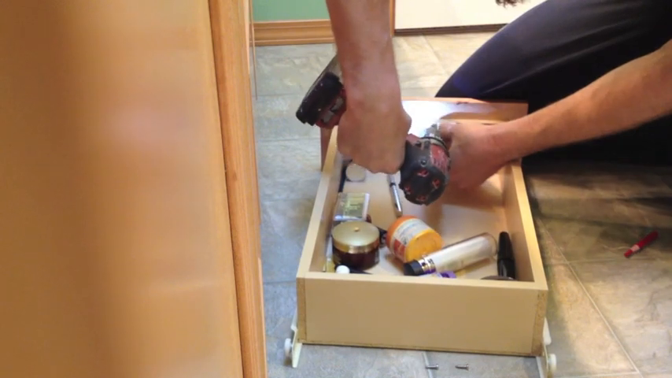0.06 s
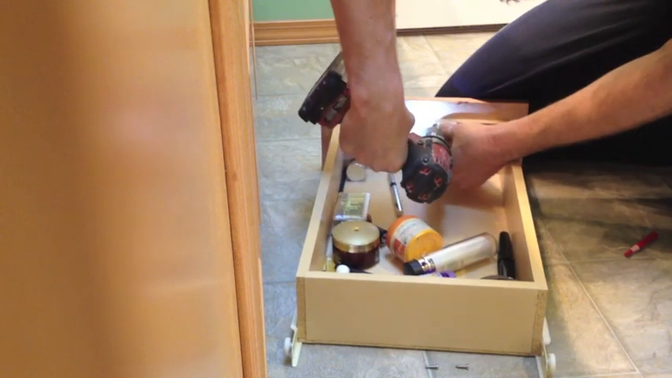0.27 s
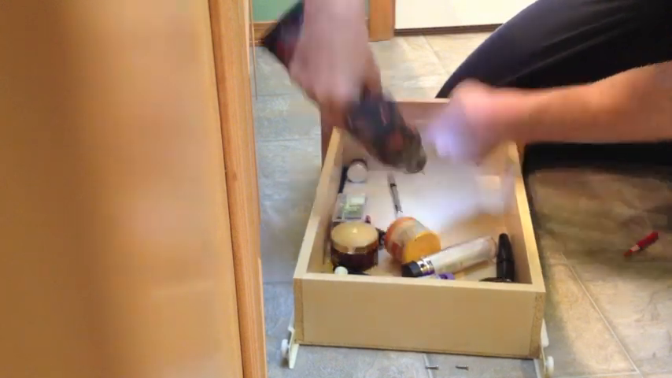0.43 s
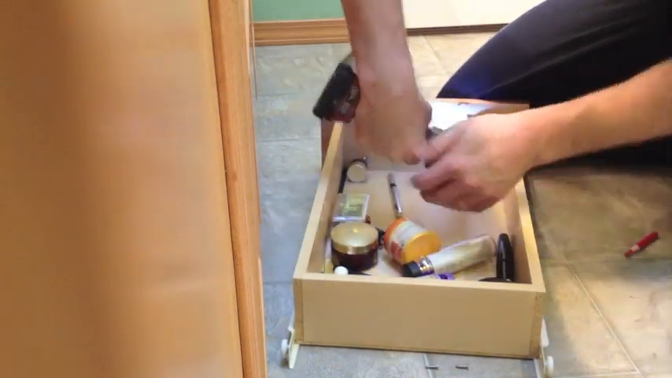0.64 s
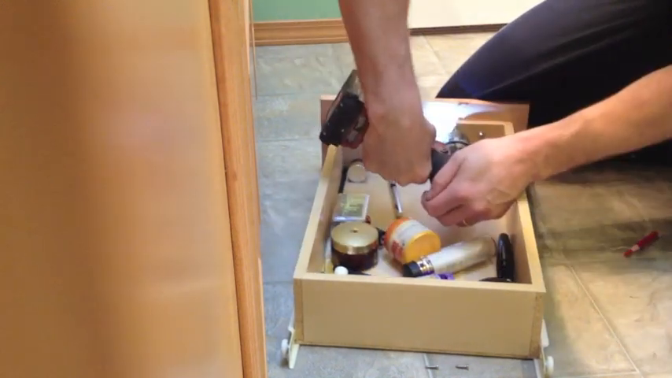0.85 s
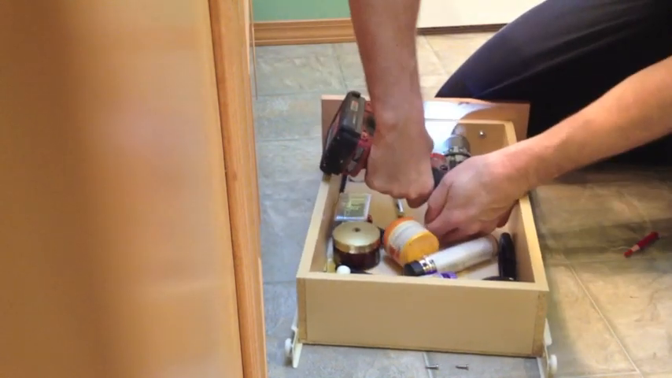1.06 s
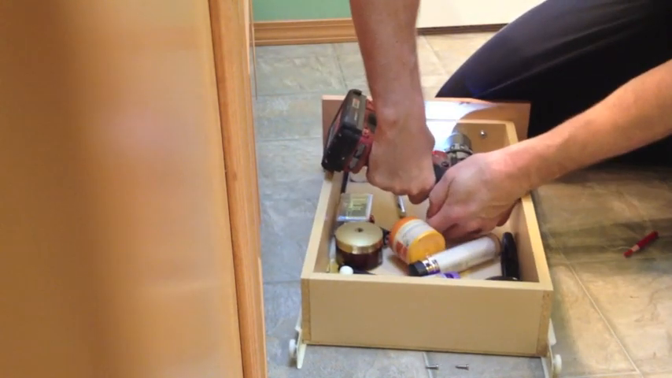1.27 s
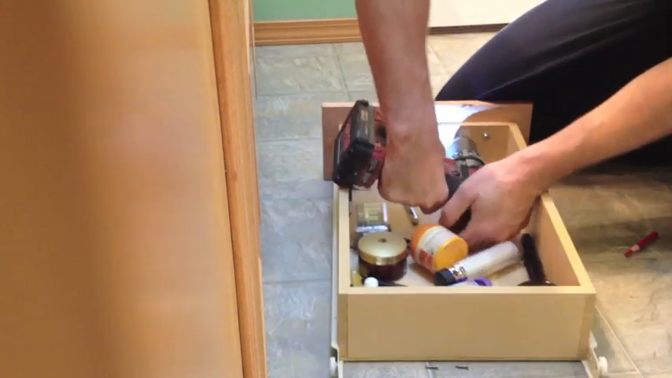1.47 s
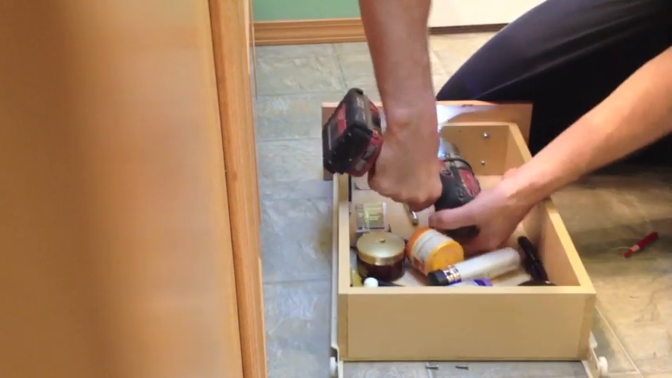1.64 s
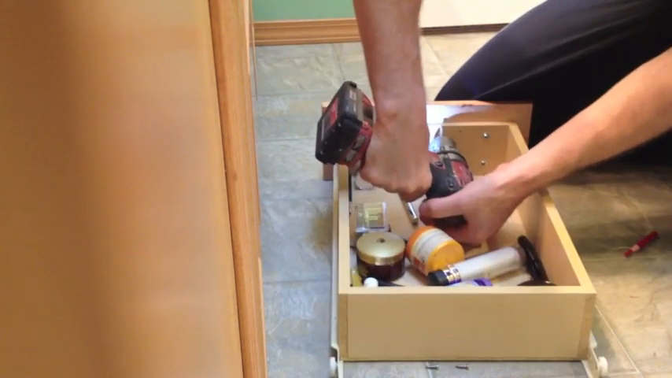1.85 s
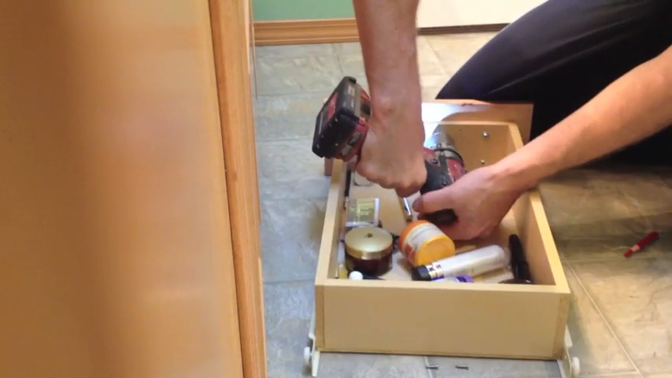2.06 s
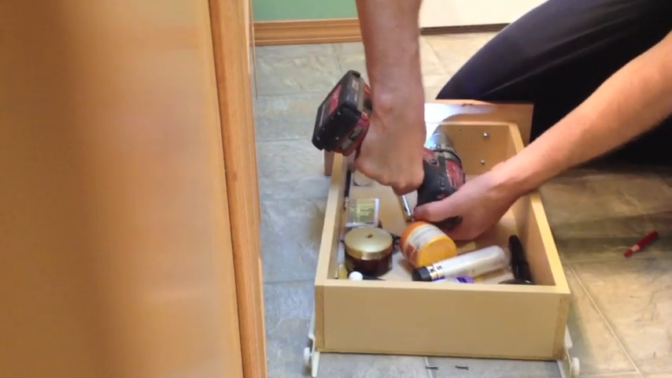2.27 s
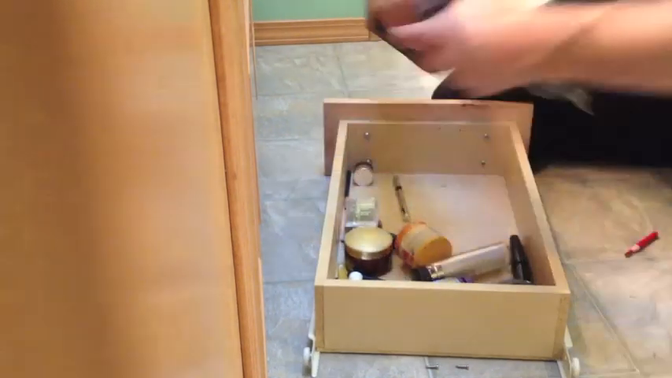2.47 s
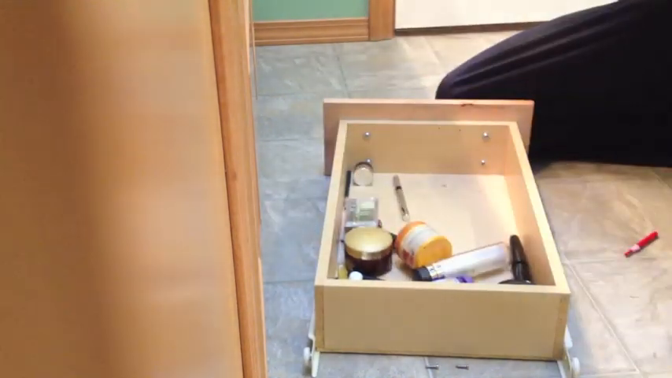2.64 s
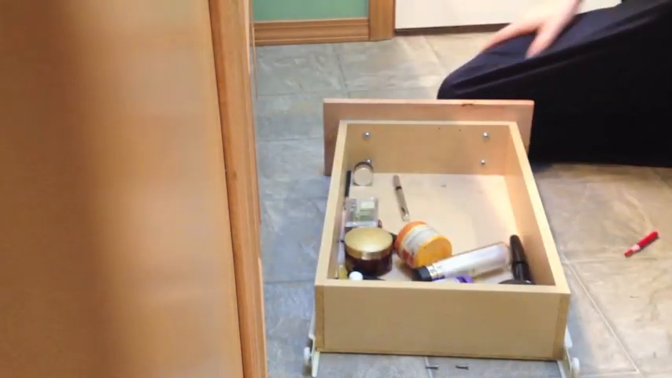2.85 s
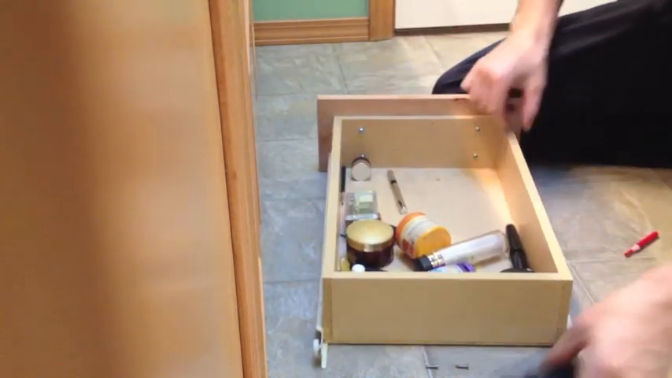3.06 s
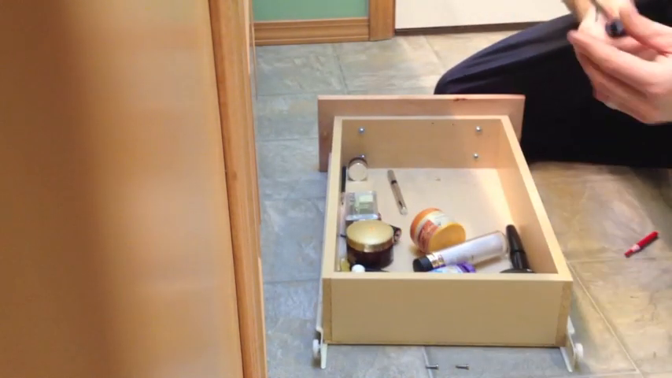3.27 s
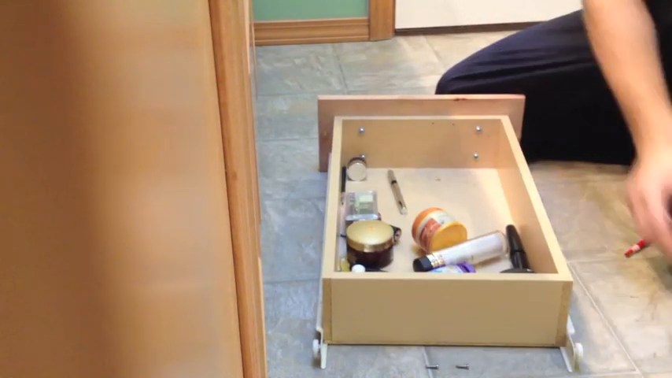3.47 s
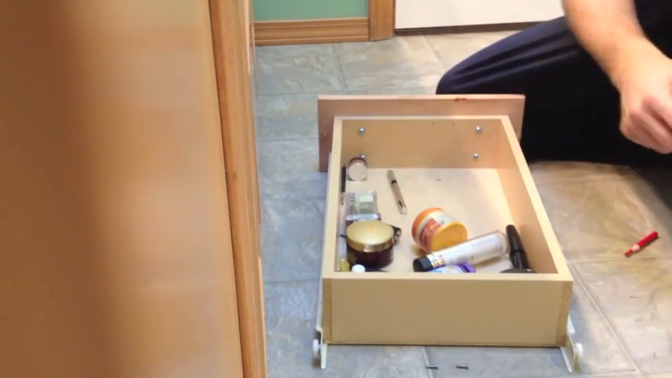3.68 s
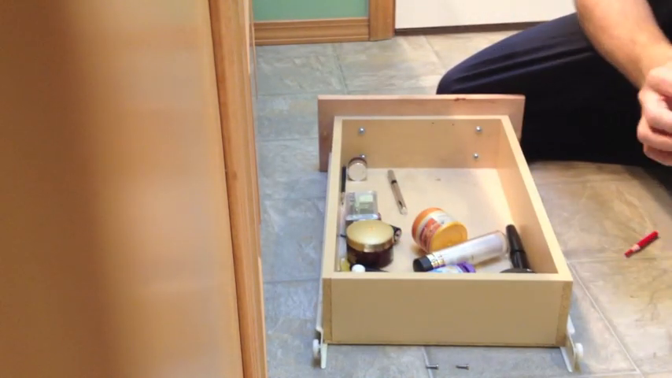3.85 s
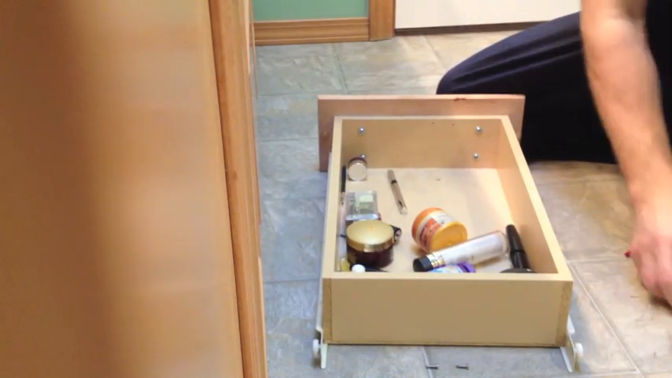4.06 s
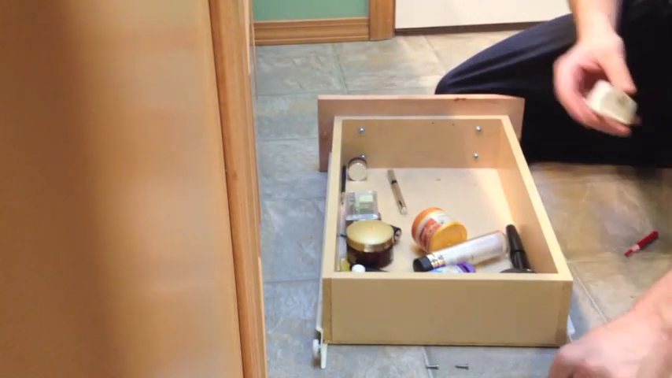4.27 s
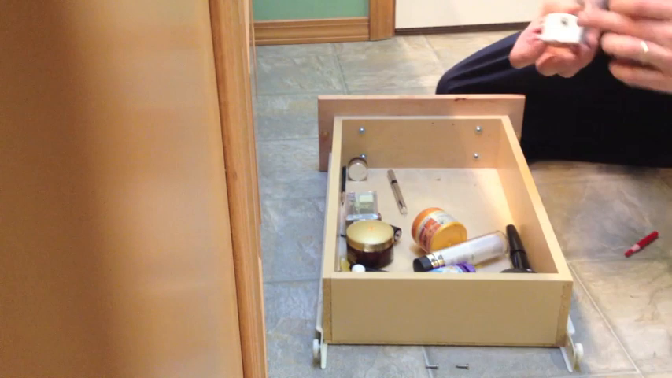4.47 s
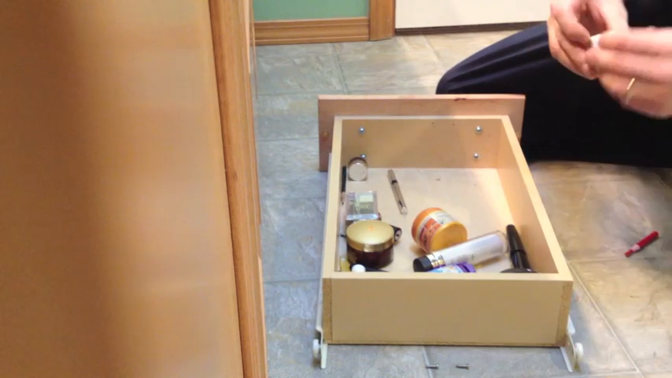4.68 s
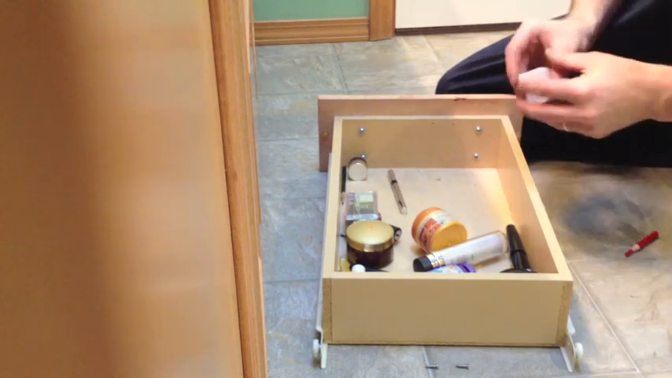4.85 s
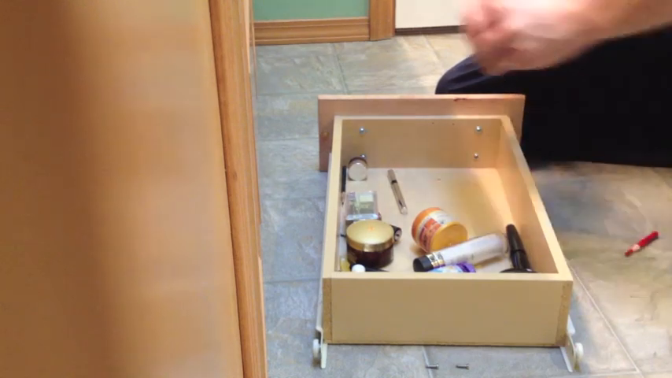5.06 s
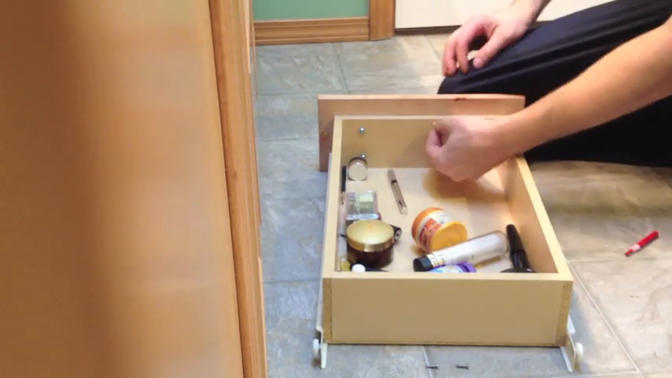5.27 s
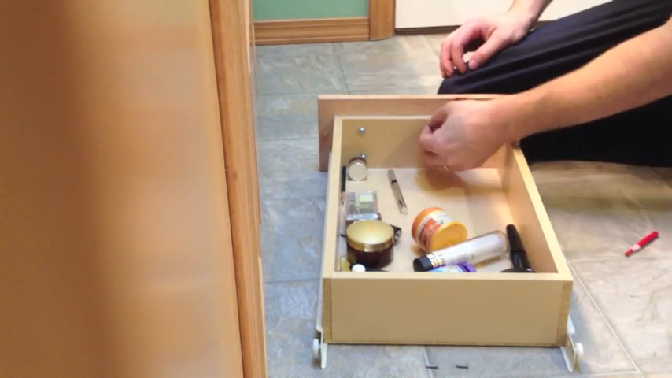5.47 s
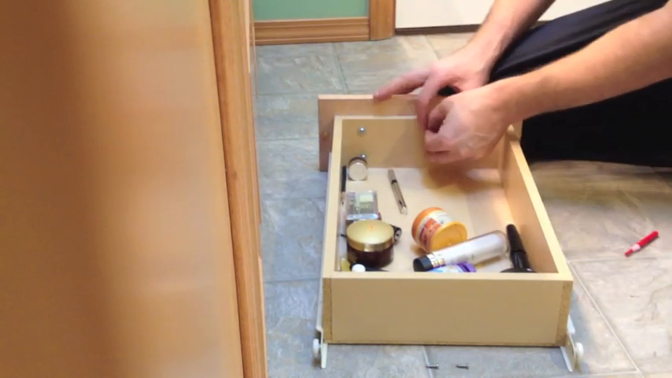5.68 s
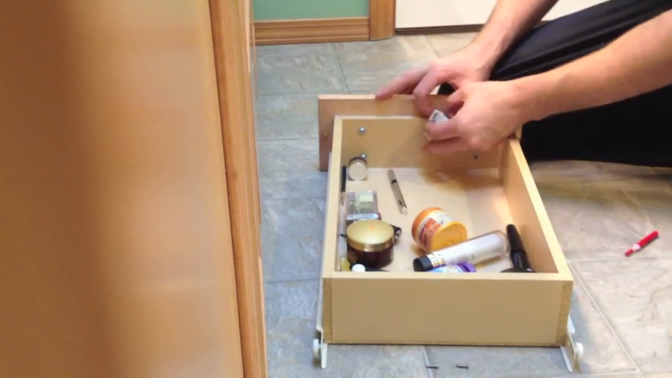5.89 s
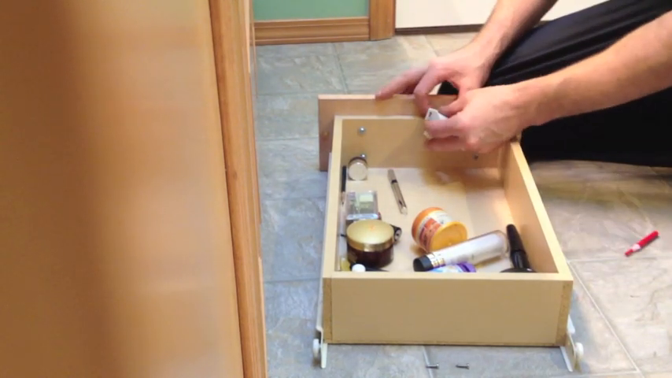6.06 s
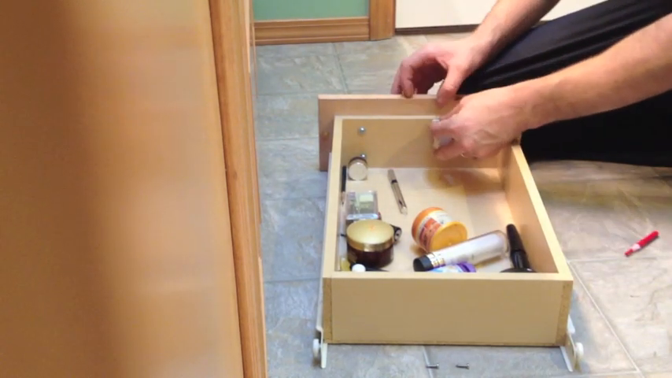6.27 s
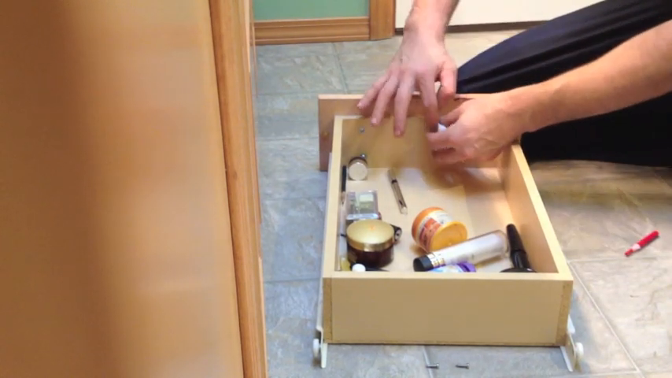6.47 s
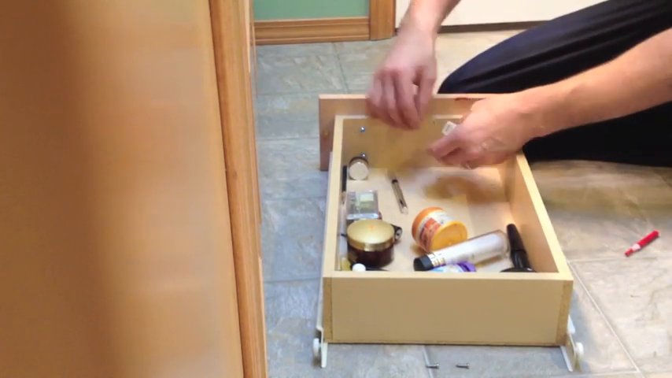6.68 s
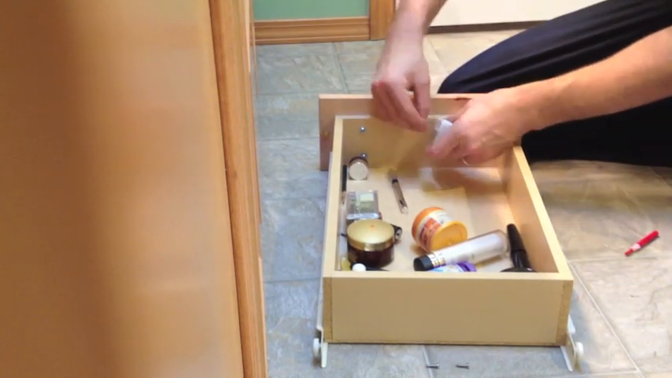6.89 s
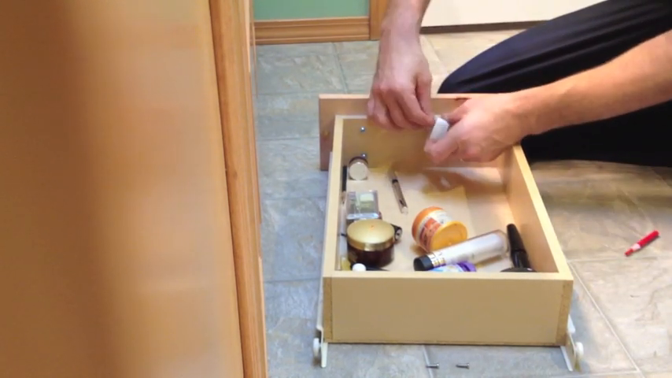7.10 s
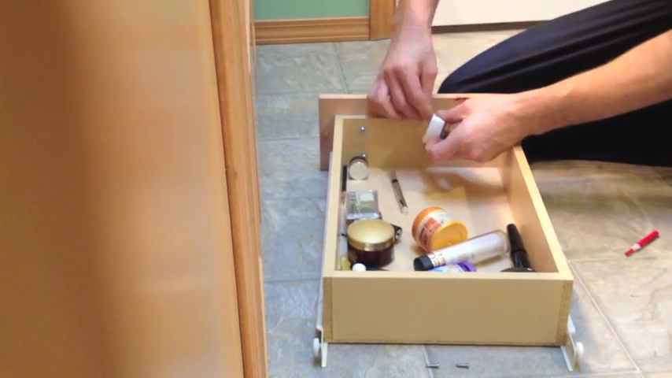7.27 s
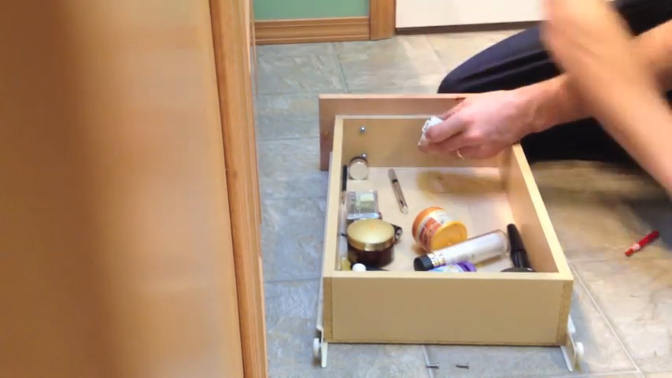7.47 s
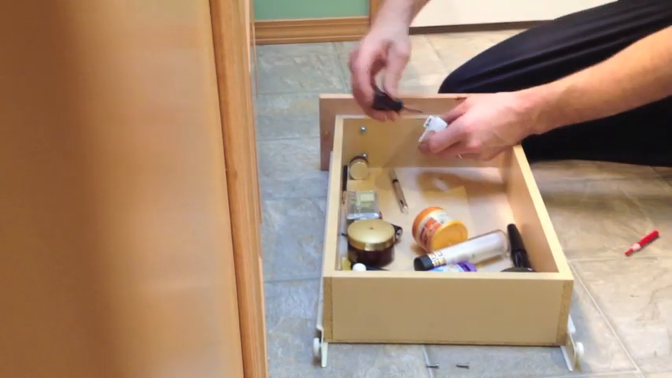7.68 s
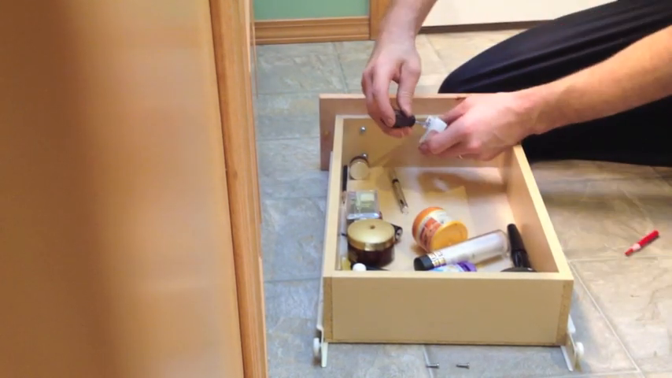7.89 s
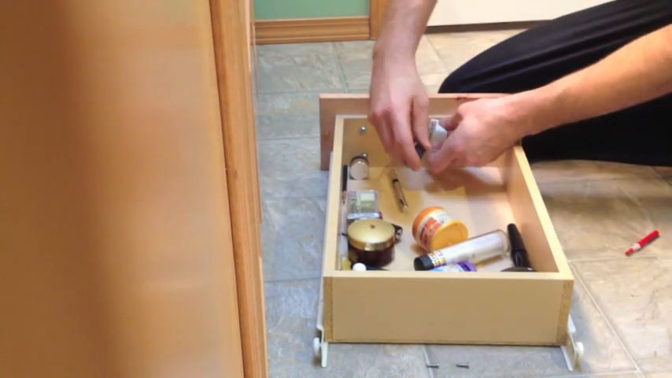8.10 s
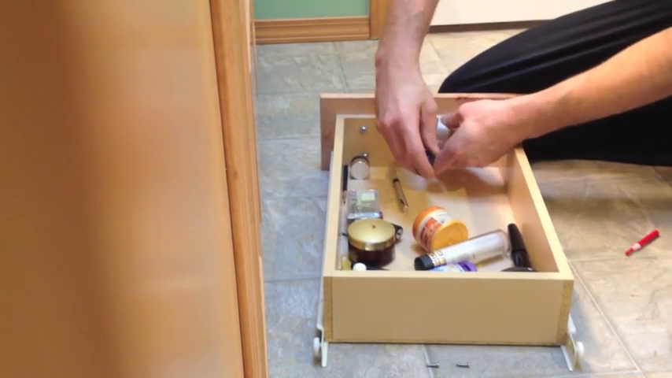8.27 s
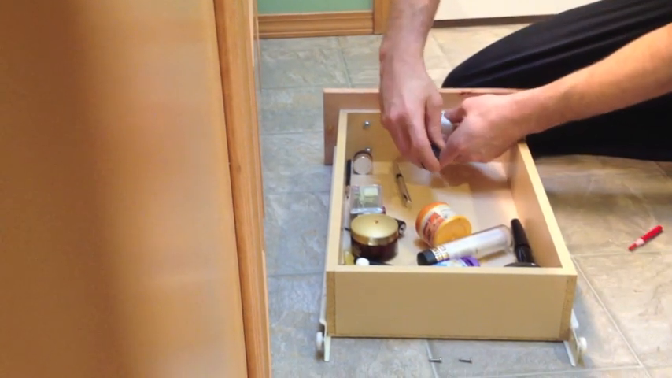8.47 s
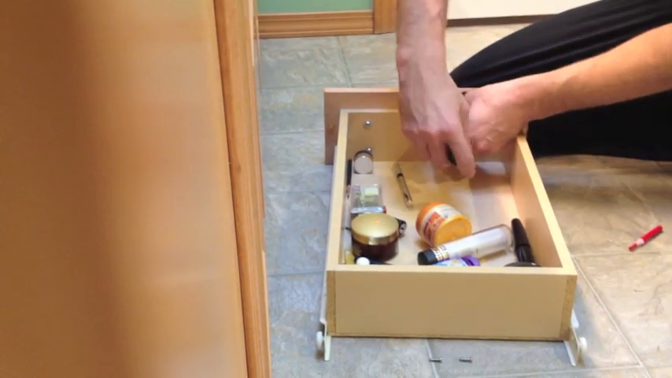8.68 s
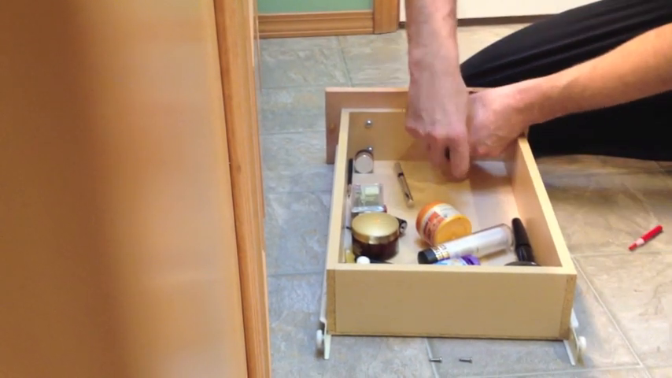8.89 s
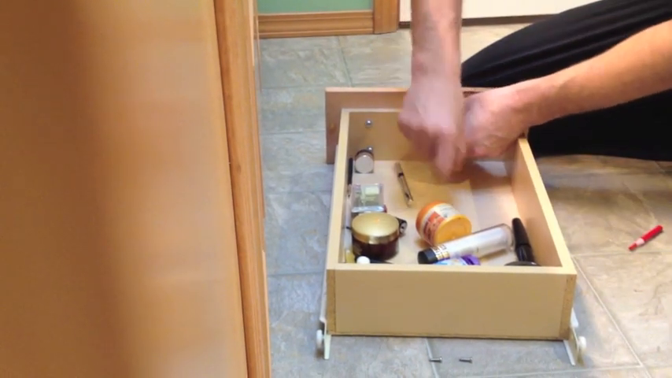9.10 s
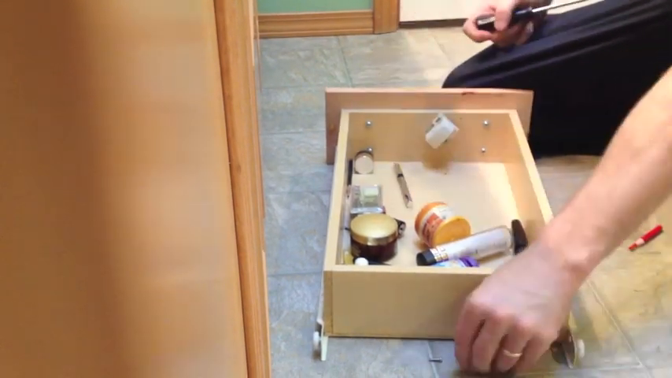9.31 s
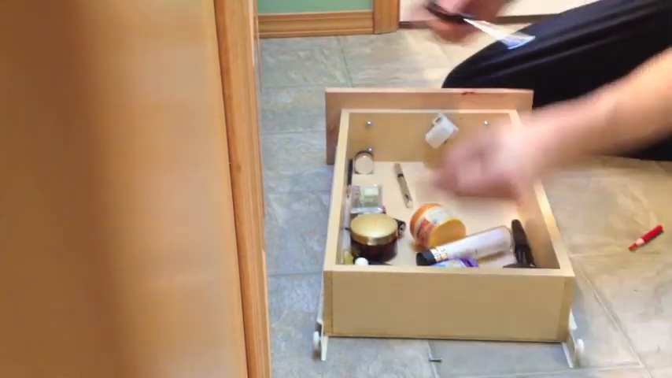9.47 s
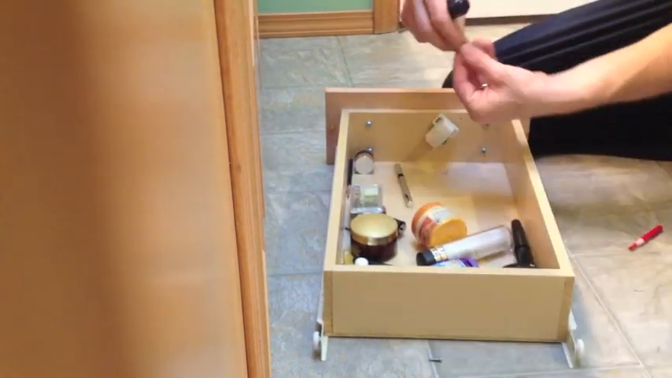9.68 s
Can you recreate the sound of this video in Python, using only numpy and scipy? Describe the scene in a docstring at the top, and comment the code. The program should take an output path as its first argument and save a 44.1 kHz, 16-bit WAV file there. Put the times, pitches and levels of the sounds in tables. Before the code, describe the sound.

A small drill whirs three times inside a wooden drawer, its bright gear whine over throbbing hiss, starting and stopping abruptly. Hard clicks and knocks fall between and just after the bursts. The rest is quiet handling: bright ticks of small parts, soft wood taps, short scuffs and sleeve rustle. A close microphone hears a short, bright indoor reverberation, identical in both channels.

```python
"""Cordless drill in a drawer

A small cordless drill runs three short bursts inside a wooden drawer on a hard floor: tones locked to its
shaft and gears, over throbbing noise. Around the bursts, hands drop and fit small screws and plastic parts:
cracks and rings make clicks, pushes of noise ring the drawer as knocks, and grainy noise makes scuffs.
Patchy noise and a faint hum lie behind. A small bright room answers the near sounds, whose bass is cut
steeply. Both channels are the same."""
import sys
import numpy as np
from scipy import signal
from scipy.fft import rfft, irfft, next_fast_len
from scipy.io import wavfile
from scipy.ndimage import uniform_filter1d, map_coordinates

SR = 44100
rng = np.random.default_rng(int(sys.argv[2]) if len(sys.argv) > 2 else 0)


def store_pcm(level_fs):
    """Save levels as 16-bit WAV."""
    pcm = np.round(np.clip(level_fs, -1, 1) * 32767).astype(np.int16)
    wavfile.write(sys.argv[1], SR, np.atleast_2d(pcm).T)


N = 429534  # length [samples]

# Levels in the tables are starting points: filters, random wobble and trims in the functions still act on them.
# room air and sleeves: (time [s], low band level [dB], high band level [dB])
RUSTLE = [(0, -66, -67.5), (.8, -67, -68), (1.901, -64.5, -66), (2.65, -63, -62.5), (3.301, -67, -66.5),
          (4.351, -66.5, -65), (4.95, -66.5, -64.5), (5.4, -64.5, -65.5), (6.4, -67.5, -67.5),
          (7.4, -67.5, -68.5), (8.5, -68.5, -69.5), (9.2, -61.5, -63), (9.74, -69.5, -66.5)]
# colour of the low band: (frequency [Hz], density [dB per Hz, relative])
LOW_AIR = [(12, -65), (20, -34.5), (65, -45.5), (206, -37), (232, -28.5), (327, -30), (422, -21),
           (508, -20), (570, -10.5), (702, -18), (844, -10.5), (2030, -14), (2810, -15.5), (5000, -27.5),
           (6500, -54), (11000, -120)]
# colour of the high band: (frequency [Hz], density [dB per Hz, relative])
HIGH_AIR = [(2060, -41), (3500, -4), (4600, -6), (6280, -5), (6740, -4.5), (12200, -7.5), (16000, -8)]
# faint tones of an appliance: (frequency [Hz], level [dB])
HUM = [(575, -82.5), (759, -78)]
# how fast the room dies away: (frequency [Hz], time to fall 60 dB [s])
ROOM = [(500, 0.15), (2500, 0.14), (7000, .13), (14000, 0.096)]
# hands and parts sliding: (middle [s], half length [s], level [dB], centre frequency [Hz])
SCUFFS = [(0.973, 0.0089, -54, 3550), (1.519, 0.016, -30.5, 824), (2.534, 0.0084, -27, 1290),
          (2.666, 0.069, -63, 11600), (2.743, 0.016, -56, 10500), (3.101, 0.02, -34.5, 870),
          (3.106, 0.022, -42.5, 5600), (4.21, 0.021, -31.5, 1320), (5.099, 0.063, -57.5, 8800),
          (5.171, 0.014, -61.5, 1500), (6.119, 0.009, -70, 2500), (6.489, 0.0089, -61.5, 1490),
          (8.737, 0.023, -57, 1314), (9.416, .02, -59, 10900), (7.59, 0.018, -47.5, 1420),
          (7.588, .014, -58, 9000), ]
# blows on the drawer and floor: (time [s], peak level [dB], strongest ring [Hz])
KNOCKS = [(0.022, -40.5, 750), (0.465, -37.5, 3360), (0.613, -20.5, 1970), (0.639, -23.5, 2010),
          (0.815, -40.5, 1110), (0.955, -41, 1190), (1.042, -37, 2490), (1.059, -35.5, 2160),
          (1.809, -47, 1080), (2.445, -26.5, 2260), (2.487, -35, 711), (2.525, -15, 1250),
          (2.717, -42.5, 910), (2.778, -29, 750), (2.909, -36.5, 1200), (3.02, -39, 1100),
          (3.618, -43, 840), (4.065, -37.5, 1320), (4.102, -36, 1100), (4.196, -28.5, 1680),
          (4.21, -35, 1570), (4.241, -31, 2260), (4.313, -34, 1300), (5.242, -39, 2140), (5.369, -50, 851),
          (5.616, -42, 1430), (5.744, -49, 1150), (5.896, -47, 1440), (6.019, -40.5, 1500),
          (6.376, -44, 1530), (6.538, -42, 970), (6.986, -49, 1430), (8.145, -45, 830), (8.236, -48, 850),
          (8.863, -51, 837), (8.943, -43.5, 3200), (8.994, -42.5, 2420), (9.06, -27.5, 2920),
          (9.165, -44, 1210), (9.226, -45, 965), (9.339, -42.5, 920), (9.638, -48.5, 1410)]
# ringing modes of the drawer: (frequency [Hz], width [Hz], level [dB])
DRAWER = [(824, 7.2, 9.5), (930, 17, -9), (1147, 8.7, 4.5), (1656, 8.2, 5.5), (1930, 57, -9),
          (2300, 140, -24), (3500, 14, -8.5), (3750, 48, -4)]
# small hard parts touching: (time [s], peak level [dB], strongest ring [Hz], lower treble gain [dB])
CLICKS = [(0.0231, -30, 5340, -2), (0.4931, -16.5, 12900, -26), (0.5746, -36, 12500, -21),
          (0.614, -6.5, 12600, -17), (0.6178, -9.5, 12700, -11.5), (0.637, -19, 12400, -22),
          (0.647, -6, 12100, -10.5), (0.815, -29, 7800, 3), (1.0412, -24, 8250, -39),
          (1.055, -23, 5470, -7), (1.8092, -39, 6000, -1.5), (2.4413, -17.5, 6600, 2.5),
          (2.4865, -22, 5960, -3), (2.5286, -10.5, 9400, -8.5), (2.7232, -31, 10900, -13),
          (2.7366, -32.5, 10700, -7), (2.78, -24.5, 7200, -7), (2.903, -30.5, 8240, -31),
          (3.007, -38.5, 11500, -13), (3.135, -25, 5140, -10), (3.6199, -28, 5170, 1),
          (4.0661, -7, 10200, -14), (4.1014, -22, 12700, -14), (4.1165, -12, 13800, -11),
          (4.14, -21, 6500, -18), (4.1598, -20, 6300, -30), (4.17, -32, 6000, -32), (4.174, -31, 6000, -30),
          (4.1848, -30, 6200, -30), (4.1906, -15, 7460, -16), (4.581, -42, 5150, -28),
          (4.5859, -10.5, 12360, -32), (4.592, -20.5, 5300, -37), (4.675, -33, 12900, -34),
          (4.707, -28.5, 12500, -30), (4.7758, -12.5, 12360, -36), (4.781, -23, 5370, -28),
          (4.8639, -21.5, 14300, -26), (4.9625, -29.5, 13100, -11), (5.0334, -35.5, 13600, -8),
          (5.0454, -37, 15500, -17), (5.2408, -27, 5930, -3.5), (5.6022, -40, 7100, -5),
          (5.6168, -26, 13000, -15), (5.813, -42, 8140, -10), (5.896, -38, 14500, -17),
          (5.9384, -32, 13600, -9), (6.0093, -36, 7900, 0), (6.168, -35, 10550, -24),
          (6.321, -32.5, 14200, -19), (6.5378, -33, 13600, -1.5), (6.5519, -33.5, 5250, 0),
          (6.618, -32, 13700, -23), (6.6252, -14.5, 13850, -26), (6.699, -38.5, 12000, 0),
          (6.815, -30, 14100, -35), (6.8444, -35, 10700, -22), (6.987, -30, 12900, -3.5),
          (7.0653, -38, 13300, -37), (7.1064, -33, 7900, -33), (7.2355, -12, 15300, -43),
          (7.395, -28, 14500, -31), (7.8755, -41.5, 6740, -8), (7.9997, -35, 14300, -28),
          (8.2951, -30, 14400, -15), (8.9938, -38, 7450, 23.5), (9.05, -35, 8300, 18),
          (9.0615, -31, 5140, 24), (9.1638, -33.5, 5130, 9), (9.1769, -13.5, 14300, -13),
          (9.342, -33, 5500, 1), (9.412, -34.5, 14100, -11)]
# trigger pulls: (on [s], off [s], free shaft speed [Hz], spin-up time [s], hiss level [dB],
# gear mesh over hiss level [dB])
BURSTS = [(0.191, 0.4, 1039, .030, -23, -8.5), (1.116, 1.708, 1205, 0.027, -20.5, -8),
          (1.964, 2.394, 1193, .0265, -20.5, -11)]
# the screw resists: (grips [s], lets go [s], speed lost as it grips [share], as it lets go [share])
LOADS = [(1.47, 1.59, .009, .009), (2.235, 2.3, .03, .205)]
# how firmly the drill bears on the wood: (time [s], housing noise over hiss level [dB])
BEARING = [(.2, -2.5), (.26, -5), (.33, -5.5), (.4, -4), (1.15, -4.5), (1.3, -6), (1.38, -6), (1.42, -1.5),
           (1.47, -6.5), (1.58, -10), (1.7, -10.5), (2, -3), (2.06, -5.5), (2.11, -6), (2.19, -8),
           (2.27, -10.5), (2.33, -12.5), (2.37, -10), (2.4, -7.5)]
# colour of the hiss: (frequency [Hz], density [dB per Hz, relative])
HISS = [(3000, -43), (4600, -6.5), (6300, -6.5), (7900, 2), (12000, -0.5), (15000, 0), (17000, -13.5)]
# colour of the housing noise: (frequency [Hz], density [dB per Hz, relative])
HOUSING = [(120, -76), (280, -32.5), (600, -18), (1000, -9), (1500, -14.5), (2600, -12), (4400, -6.5),
           (6500, -10.5), (10000, -51)]
# shaft tones: (shaft order [multiple], level over hiss level [dB], gain per dB of bearing [dB],
# gain per dB of speed [dB])
SHAFT = [(1, -11.5, 0.51, 3.5), (2, -20, 0.24, 9), (3, -18.5, .5, 11), (4, -22.5, .5, 11)]
# weaker gear tones: (shaft order [multiple], level over hiss level [dB])
GEARS = [(.236, -36), (2.827, -30.5), (4.236, -28), (5, -29.5), (7, -37.5), (8, -29), (8.473, -30),
         (9.474, -17), (10.474, -26.5), (11, -20.5)]
# how the casing radiates a tone: (frequency [Hz], gain [dB])
CASING = [(250, -6), (800, 0), (950, 10), (1100, -2.5), (1200, 0.5), (3000, -1), (3600, 0), (4200, -12.5),
          (4750, 0.5), (7500, 3), (9300, 6.5), (10400, -1), (12000, -1)]
# an order swells or fades for a moment: (shaft order [multiple], middle [s], half length [s], gain [dB])
SWELLS = [(1, 2.3, .04, 5.5), (3, 1.42, .03, 10), (4, 1.55, .07, 10), (2, 1.65, 0.071, 4),
          (2, 2.16, 0.076, 8.5), (3, 2.125, 0.065, 8), (4, 2.134, 0.079, 11.5), (1, 2.3, .022, -10.5),
          (10, 1.2, 0.028, -8), (10, 2.22, .025, -7.5)]

MESH = 10  # pinion teeth
SETTLE_S, SETTLE_SHARE = .12, .03  # the shaft nears its speed fast, then creeps the last share
ATTACK_S, BRAKE_DB_PER_S, BRAKE_HZ_PER_S = 0.0071, 690, 1500
AIRED = .75  # share of the shaft and mesh whine that gets room reverberation; the rest stays dry
HISS_GROWS, TONES_GROW = 1.19, 2.5  # dB of level per dB of speed
TOP_HZ = 15800


def amp(db):
    """Turn decibels into a gain."""
    return 10 ** (np.asarray(db) / 20)


def unit(x):
    """Scale to an average (rms) level of 1 along the last axis."""
    return x / np.sqrt(np.mean(x ** 2, axis=-1, keepdims=True) + 1e-20)


def along(points, hz):
    """Read a curve of (frequency, value) points on a log frequency axis."""
    f, v = np.transpose(points)
    return np.interp(np.log(hz + 1), np.log(f + 1), v)


def filtered(x, response):
    """Shape a sound by a complex gain for each frequency."""
    m = next_fast_len(x.shape[-1] + SR // 4)
    spectrum = rfft(x, m) * response(np.fft.rfftfreq(m, 1 / SR))
    return irfft(spectrum, m)[..., :x.shape[-1]]


def ring(f, hz, width):
    """Response of one resonance: a narrower width rings for longer."""
    return 1j * f * width / (hz * hz - f * f + 1j * f * width)


def wobble(size, rate):
    """A smooth random curve through rate random points a second."""
    return map_coordinates(rng.standard_normal(size // 64 + 4), [np.arange(size) * rate / SR])


def lagged(x, tau):
    """Follow x sluggishly from rest, with time constant tau in seconds."""
    step = 1 / (tau * SR)
    return signal.lfilter([step], [1, step - 1], x)


def rush(size, spectrum, patchy_db):
    """Coloured noise of rms 1, with random louder and softer patches in time and pitch."""
    z = signal.stft(rng.standard_normal(size + 512), nperseg=256)[2]
    field = uniform_filter1d(rng.standard_normal(z.shape), size=4, axis=0)
    field = uniform_filter1d(field, size=6, axis=1)
    patchy = z * amp(patchy_db * field / field.std())
    noise = signal.istft(patchy, nperseg=256)[1][:size]
    return unit(filtered(noise, lambda hz: amp(along(spectrum, hz))))


def tails(count):
    """Random room answers of energy 1; each frequency dies at its own speed."""
    hz, t, z = signal.stft(rng.standard_normal((count, SR // 4)), SR, nperseg=128)
    decay = amp(-60 * t / along(ROOM, hz)[:, None])
    tail = signal.istft(z * decay, SR, nperseg=128)[1]
    return unit(tail) / np.sqrt(tail.shape[1])


def placed(rows, sounds, wet_db):
    """Scale each sound to its peak, add its own room answer and set it at its time."""
    sounds = sounds / np.abs(signal.hilbert(sounds)).max(axis=1, keepdims=True)
    padded = np.pad(sounds, ((0, 0), (60, 0)))  # the room answers 60 samples late
    mix = amp(wet_db) * signal.fftconvolve(padded, tails(len(rows)), axes=1)
    mix[:, :sounds.shape[1]] += sounds
    out = np.zeros(N + SR)
    for (s, db), sound in zip(rows[:, :2], mix):
        out[round(s * SR):][:len(sound)] += amp(db) * sound
    return out[:N]


def roomy(x, wet_db):
    """Reverberate a lasting sound in overlapping pieces, with a fresh random tail every 50 ms."""
    out, hop = np.pad(x, (0, SR)), SR // 20
    starts = np.arange(0, len(x) - 2 * hop, hop)
    pieces = x[starts[:, None] + np.arange(2 * hop)] * np.hanning(2 * hop)
    echoes = signal.fftconvolve(pieces, tails(len(starts)), axes=1)
    for start, echo in zip(starts, echoes):
        out[start:][:len(echo)] += amp(wet_db) * echo
    return out[:len(x)]


def background():
    """Room air, sleeves and fingers: patchy noise with faint ticks, over an appliance hum."""
    s, low_db, high_db = np.transpose(RUSTLE)
    t = np.arange(N) / SR
    ticks = (rng.random(N) < 30 / SR) * rng.exponential(size=N)  # about 30 a second
    tick_decay = amp(-60 * t[:SR // 10] / 0.018)
    ticks = 1 + 0.8 * signal.fftconvolve(ticks, tick_decay)[:N]
    low_level = amp(np.interp(t, s, low_db) + 1.2 * wobble(N, 7.8))
    low = low_level * np.sqrt(ticks) * rush(N, LOW_AIR, patchy_db=2.5)
    high_level = amp(np.interp(t, s, high_db) + 0.54 * wobble(N, 26))
    high = high_level * ticks * rush(N, HIGH_AIR, patchy_db=0.5)
    hum = sum(amp(db - 1.5 + 3.4 * wobble(N, 2.1)) * np.sin(2 * np.pi * hz * t) for hz, db in HUM)
    return low + high + hum


def scuffs():
    """Sliding makes grainy noise that swells and fades in a broad band."""
    out, t = np.zeros(N + SR), np.arange(SR // 2) / SR - .2  # time 0 is the middle of the rub
    for s, half, db, hz in SCUFFS:
        grain = rng.standard_normal(len(t)) * amp(4.8 * wobble(len(t), 302.8))
        rub = unit(filtered(grain, lambda f: ring(f, hz, 0.91 * hz) ** 2))
        rub = rub * np.exp(-(t / half) ** 2)
        rub = rub + amp(-3.5) * signal.fftconvolve(rub, tails(1)[0])[:len(t)]
        out[round((s + t[0]) * SR):][:len(t)] += amp(db) * rub
    return out[:N]


def knocks():
    """A short push of noise rings the drawer's panels and the struck spot."""
    rows, t = np.array(KNOCKS), np.arange(SR // 10) / SR
    push = rng.standard_normal((len(rows), len(t))) * (t / .0012) * np.exp(-t / 0.0013)
    strength_db = rng.normal(0, 0.95, (len(rows), len(DRAWER)))  # each blow excites the modes differently
    hz = rows[:, 2:3]

    def wood(f):
        return sum((-1) ** k * amp(db + strength_db[:, k:k + 1]) * ring(f, centre, width + 150)
                   for k, (centre, width, db) in enumerate(DRAWER))

    def colour(f):
        struck_spot = amp(-1.5) * ring(f, hz, 310)
        return (amp(-5.0) * wood(f) + struck_spot + amp(-13.5)) * ring(f, hz, 2.32 * hz) ** 2

    return placed(rows, filtered(push, colour), wet_db=4.0)


def clicks():
    """A touch makes a millisecond crack, broad in the treble, and rings the part at its own pitch."""
    rows, t = np.array(CLICKS), np.arange(SR // 40) / SR
    crack = rng.standard_normal((len(rows), len(t))) * amp(-60 * (t / 0.0051) ** 1.12)
    touch = np.tile(t == 0, (len(rows), 1)) * 6.4  # a single-sample impulse
    peak_db, hz, low_db = rows[:, 1:2], rows[:, 2:3], rows[:, 3:4]

    def small(f):  # tiny parts radiate no bass
        return (1j * f / (3600 + 1j * f)) ** 8

    def broad(f):
        treble = amp(-10.5) * ring(f, hz, 1.3 * hz) + amp(-14.5)
        treble = treble + amp(-6.5) * ring(f, 5500, 1200) + amp(-12.5) * ring(f, 8300, 1500)
        lower_treble = amp(low_db + 0.8) * ring(f, 3310, 3200) ** 2
        return small(f) * treble + lower_treble

    def own(f):
        return small(f) * (amp(-0.2) * ring(f, hz, 0.018 * hz) + amp(-3) * ring(f, hz, .062 * hz))

    # fainter clicks get slightly more room, so they sound softer and longer
    wet_db = 0.14 - 0.058 * (peak_db + 23.5)
    return placed(rows, filtered(crack, broad) + filtered(touch, own), wet_db)


def drill():
    """Shaft and gear tones follow the speed; the noise throbs with the shaft and the slower chuck."""
    out = np.zeros(N + SR)
    for on, off, free_hz, spin_s, level_db, mesh_db in BURSTS:
        n = np.arange(round(on * SR), round((off + .06) * SR))
        t, size = n / SR, len(n)

        # speed: spin-up, load of the screw, braking after the trigger is let go
        load = sum(np.interp(t, (a, b), (first, last), 0, 0) for a, b, first, last in LOADS)
        speed = (1 - SETTLE_SHARE) * lagged(1 - load, spin_s) + SETTLE_SHARE * lagged(1 - load, SETTLE_S)
        braking = np.clip(t - off, 0, None)
        hz = free_hz * speed - BRAKE_HZ_PER_S * braking
        turns = np.cumsum(hz * (1 + 0.00075 * wobble(size, 90))) / SR

        spin_db = 20 * np.log10(lagged(np.ones(size), spin_s))
        hiss_db = level_db + HISS_GROWS * spin_db - BRAKE_DB_PER_S * braking
        whine_db = level_db - 2 * BRAKE_DB_PER_S * braking
        tones_db = whine_db + TONES_GROW * spin_db
        housing_db = np.interp(t, *np.transpose(BEARING))

        def tone(order, db, flutter_db):
            level = amp(db + along(CASING, order * hz) + flutter_db * wobble(size, 39.46))
            return np.sqrt(2) * level * np.sin(2 * np.pi * (order * turns + rng.random()))

        def swell_db(order):
            return sum(db * np.exp(-((t - s) / half) ** 4) for k, s, half, db in SWELLS if k == order)

        throb_db = 2.2 * np.sin(2 * np.pi * turns)
        throb_db += 1.6 * np.sin(2 * np.pi * 0.18 * turns)  # the chuck turns slower
        throb = amp(throb_db + 0.84 * wobble(size, 250))
        sound = amp(hiss_db - 5.0) * unit(throb * rush(size, HISS, patchy_db=0.0))
        sound += amp(hiss_db + housing_db - 7.0) * unit(throb * rush(size, HOUSING, patchy_db=2.0))

        whine = sum(tone(k, whine_db + db + gain * housing_db + grows * spin_db + swell_db(k), 2.2)
                    for k, db, gain, grows in SHAFT)
        whine += tone(MESH, tones_db + mesh_db + swell_db(MESH), 2.4)
        sound += sum(tone(k, tones_db + db, 2.8) for k, db in GEARS)

        edges = np.clip(np.minimum((t - on) / ATTACK_S, (t[-1] - t) / .007), 0, 1)
        aired = amp(-1.5) * edges * (sound + AIRED * whine)
        aired = np.pad(aired, (0, SR // 4 + 200))  # space for the room to die away
        out[n[0]:][:len(aired)] += roomy(aired, wet_db=0.0)
        out[n] += edges * (1 - AIRED) * whine  # the dry share
    return out[:N]


def scene():
    """The near sources lose their bass, then join the background, the same in both channels."""
    near = drill() + clicks() + knocks() + scuffs()
    near = filtered(near, lambda f: (1j * f / (520 + 1j * f)) ** 3)  # steep bass cut
    return np.tile(near + background(), (2, 1))


def record(dry):
    """The highest treble fades out above the band limit, by 0.07 dB per Hz up to 100 dB."""
    return filtered(dry, lambda hz: amp(-np.clip((hz - TOP_HZ) * .07, 0, 100)))


dry = scene()
out = record(dry)
store_pcm(out)
```